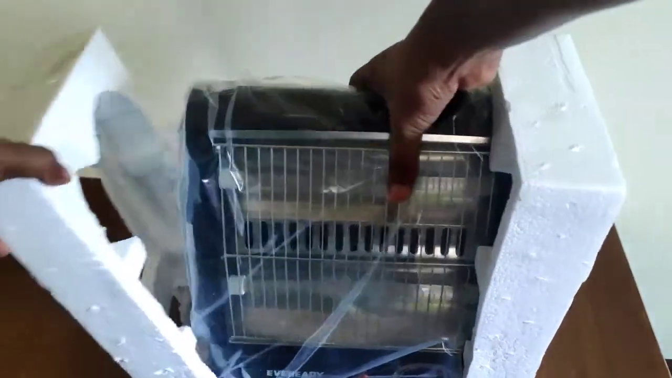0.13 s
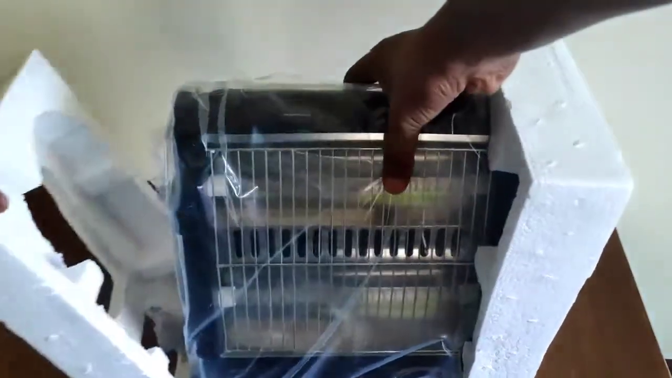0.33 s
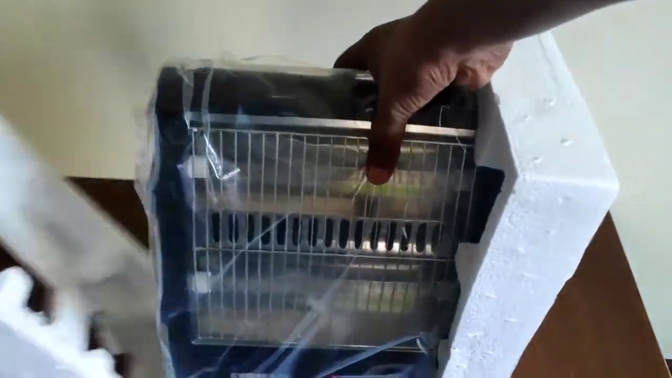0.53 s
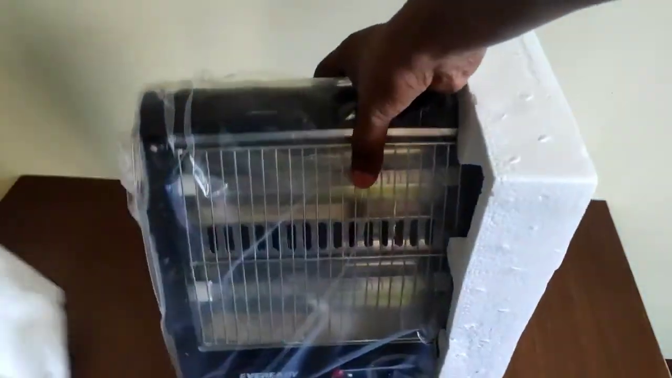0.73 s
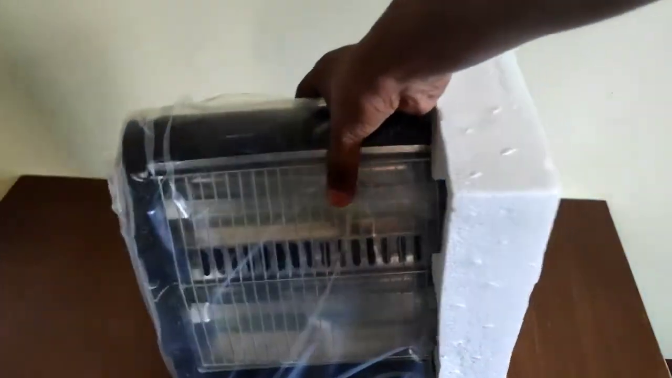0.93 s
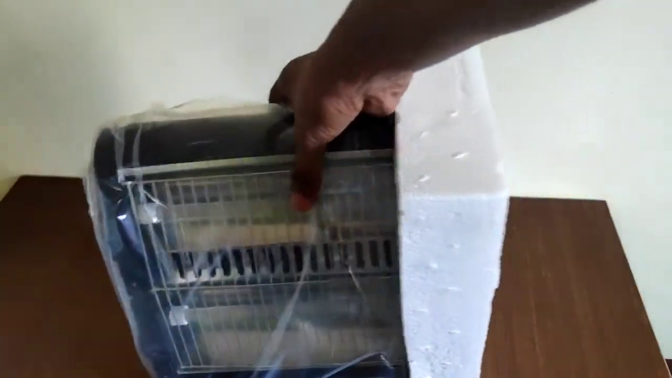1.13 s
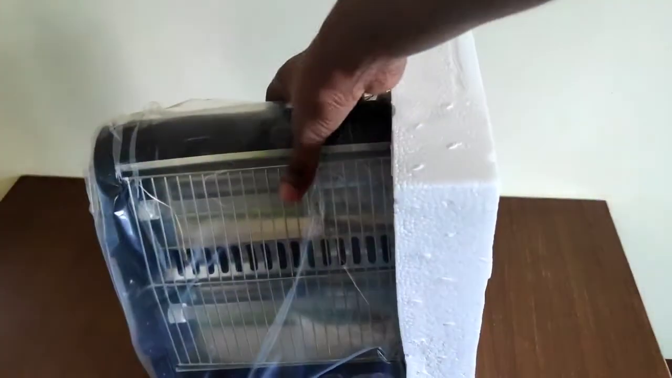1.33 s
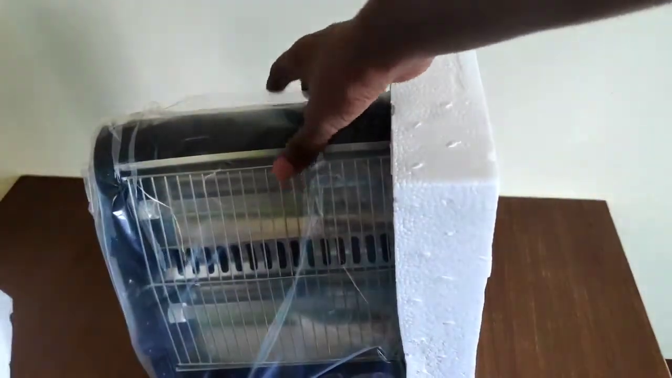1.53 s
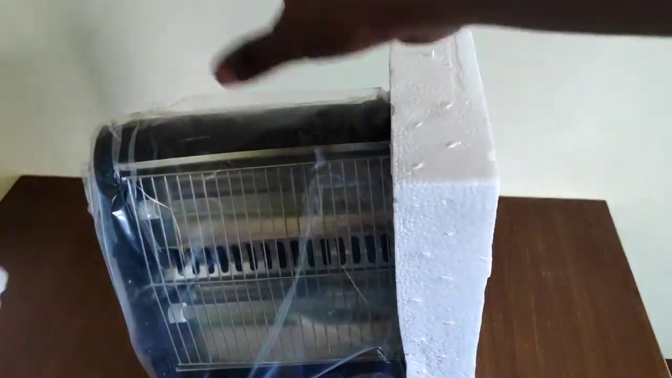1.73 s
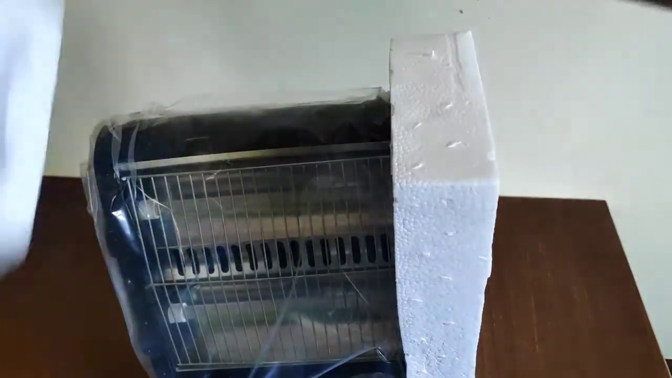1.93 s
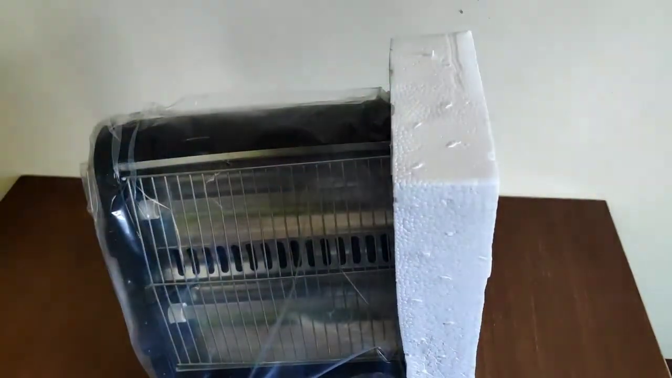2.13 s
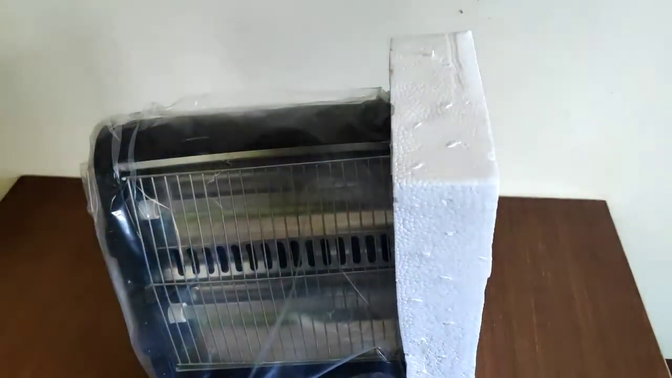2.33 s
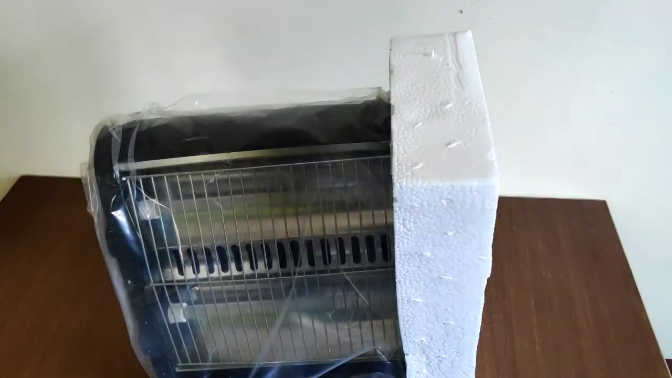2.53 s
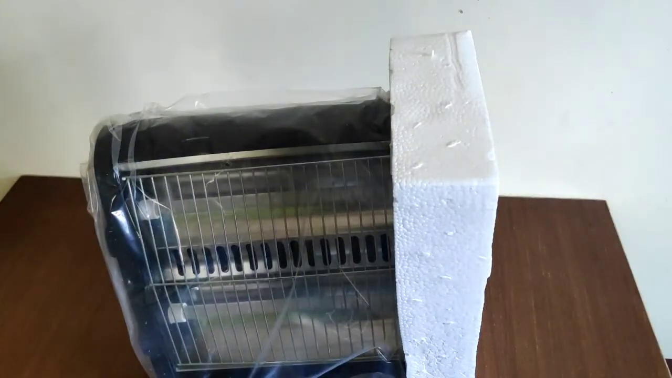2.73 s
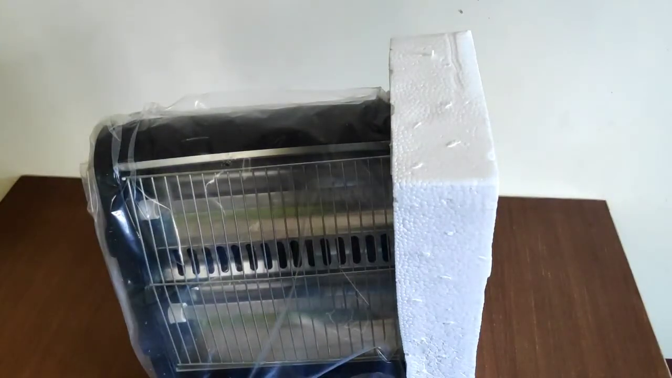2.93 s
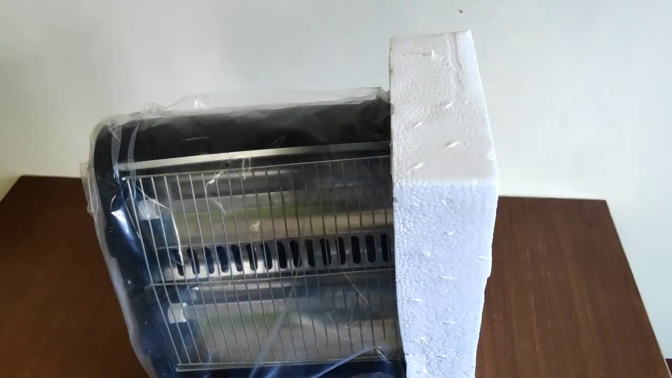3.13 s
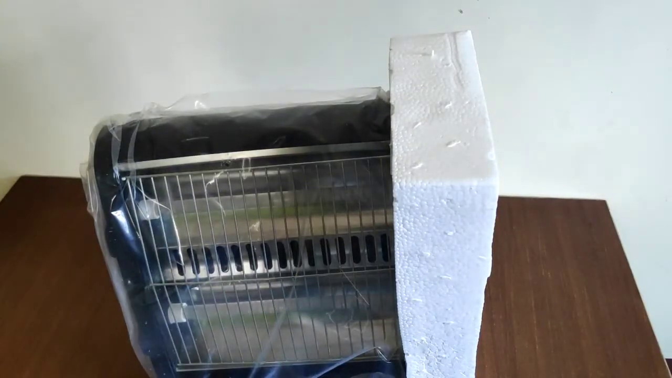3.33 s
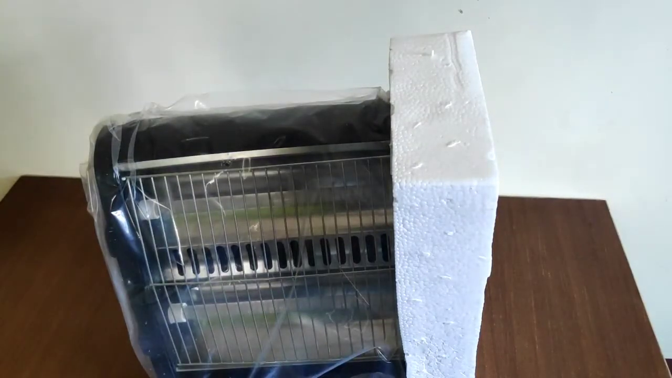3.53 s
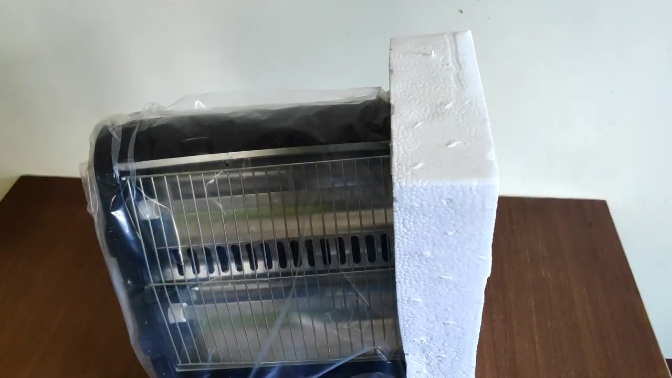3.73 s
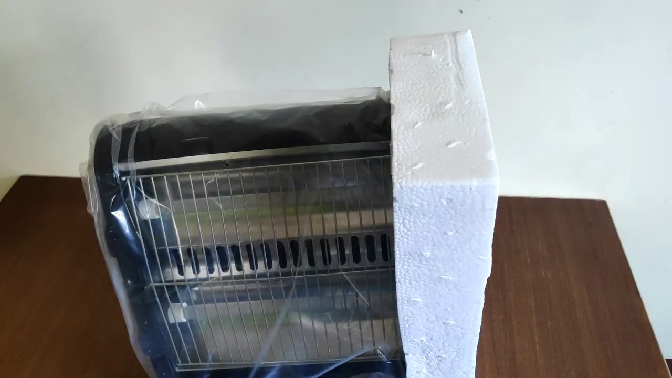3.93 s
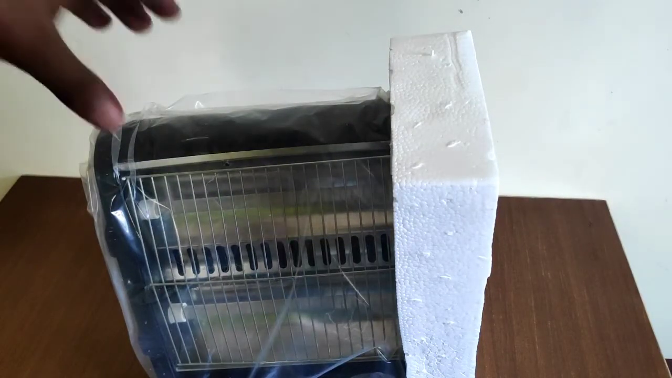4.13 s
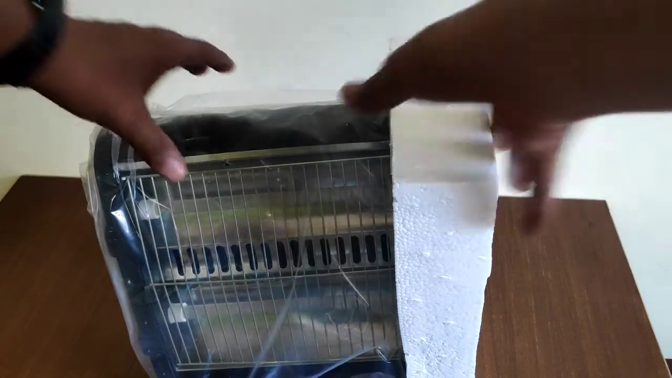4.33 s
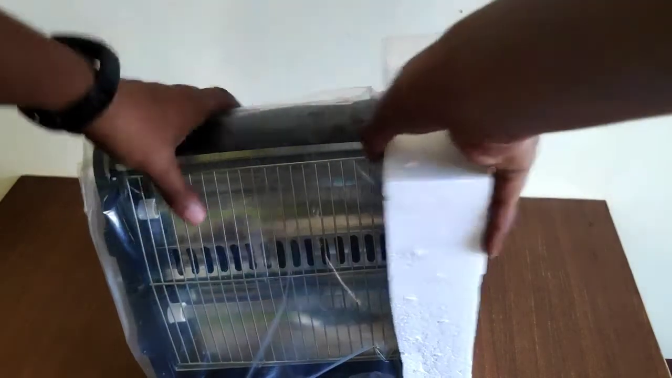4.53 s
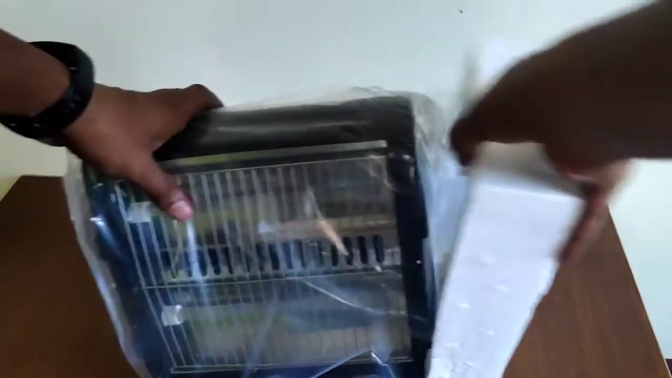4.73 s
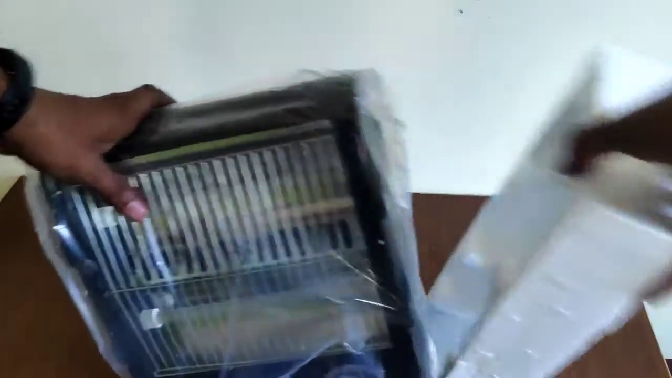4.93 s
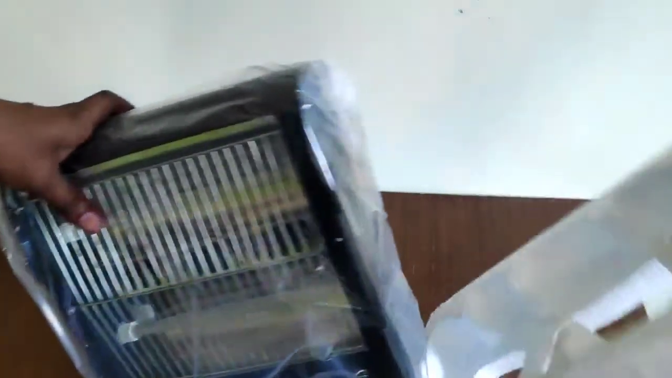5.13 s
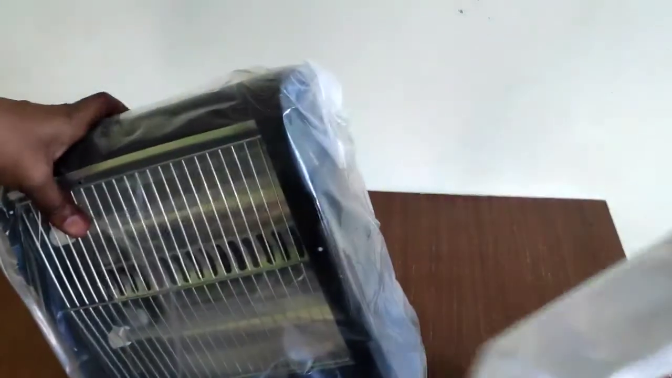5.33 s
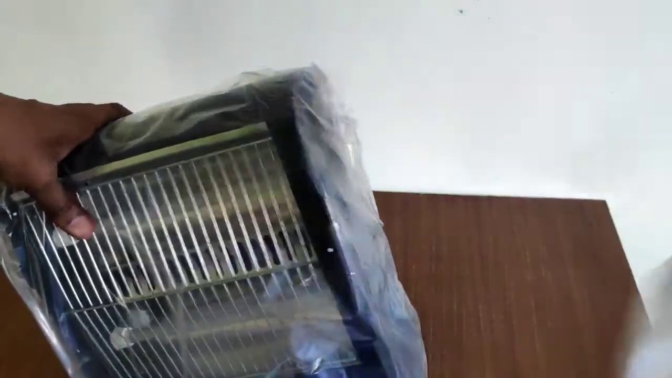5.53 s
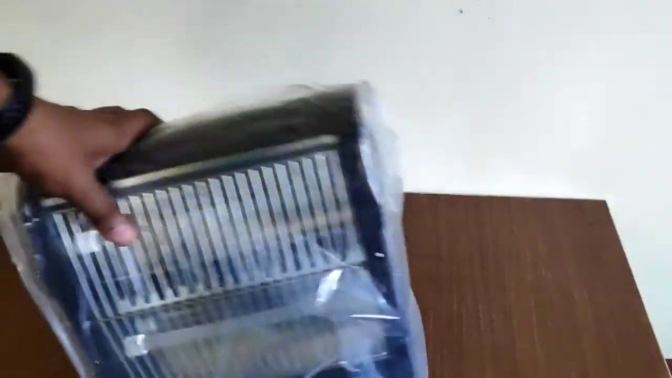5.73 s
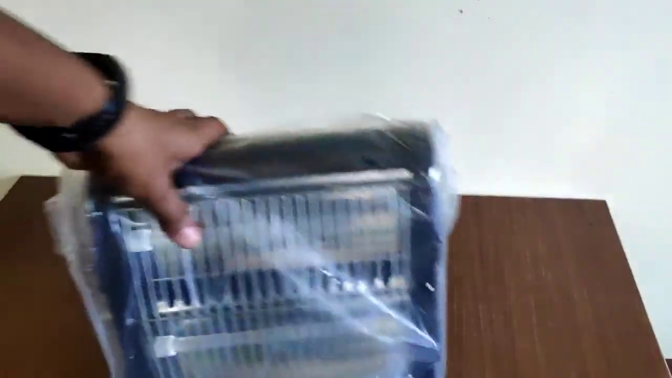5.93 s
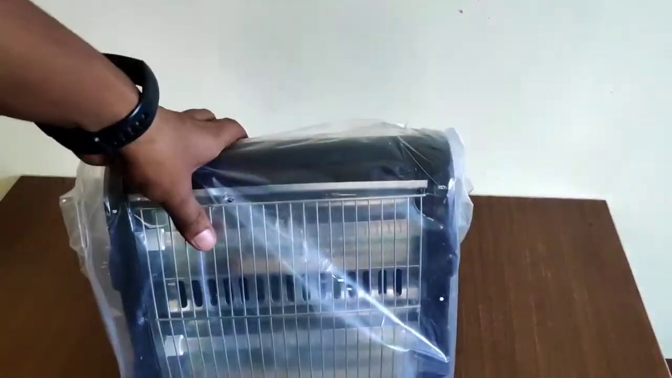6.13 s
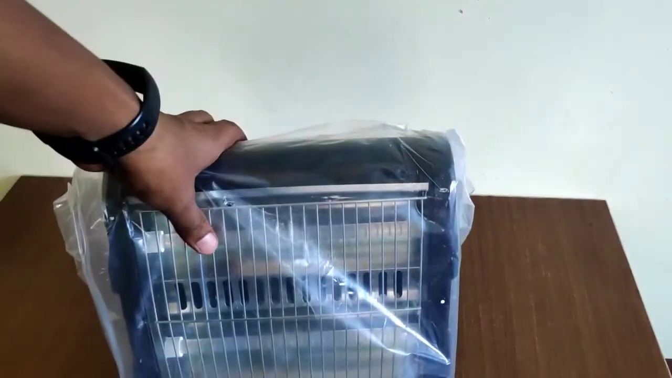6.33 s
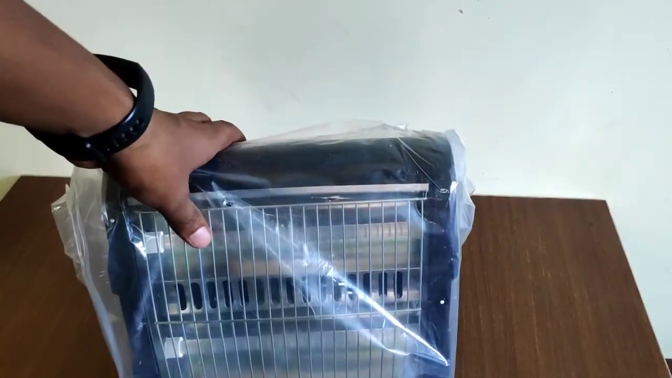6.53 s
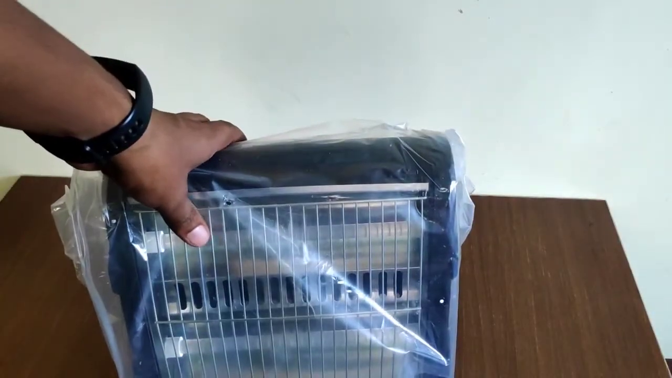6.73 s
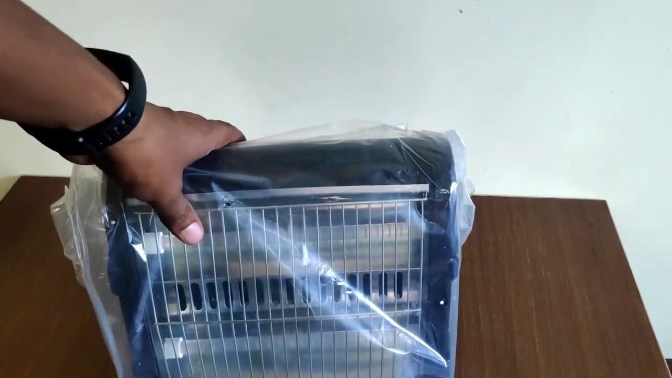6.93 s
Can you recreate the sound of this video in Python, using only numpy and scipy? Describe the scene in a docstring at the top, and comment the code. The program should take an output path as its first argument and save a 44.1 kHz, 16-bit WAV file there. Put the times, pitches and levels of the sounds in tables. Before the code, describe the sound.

Foam packing scrapes and snaps off a film-wrapped appliance, a heavy knock on a table, light foam clatter, more rubbing, another knock, then film rustle.

```python
"""Foam scrapes, squeaks and snaps, and film rustles, as packing blocks are worked off a film-wrapped heater.
The heater stands on a wooden table in a bare room; twice, tilted, it drops back onto the table.
In between, the first foam block is handled to one side and lands with a hollow clatter.
Friction is built from trains of tiny slips; snaps are decaying noise bursts and squeaks are gliding tones.
Knocks and bumps ring decaying modes over a filtered noise thud."""
import sys
import numpy as np
from scipy import signal
from scipy.io import wavfile
from scipy.ndimage import uniform_filter1d, minimum_filter1d

SR = 44100
rng = np.random.default_rng(int(sys.argv[2]) if len(sys.argv) > 2 else 0)


def file_out(sig):
    """Save sig as 16-bit WAV at sys.argv[1]."""
    # one column per channel
    cols = np.atleast_2d(sig).T
    # limit, then scale
    lim = np.clip(cols, -1, 1)
    pcm = np.round(lim * 32767).astype(np.int16)
    wavfile.write(sys.argv[1], SR, pcm)


N = 308700

# Rubs: the first block is tugged off, the heater settles and the block is carried aside, the second block
# is gripped and pulled off, the tilted heater is swung back, and the loose film is smoothed:
# (start [s], rise [s], hold [s], dying time [s], foam scrape [dB], film rustle [dB], body rumble [dB],
#  foam resonance [Hz], coarseness [dB]); levels are ahead of the balance in stroke() and scene()
RUB_STROKES = [ (0.0, 0.0067, 0.14, 0.063, -23, -32.5, -32.5, 1050, 4),
               (0.138, 0.0057, 0.037, 0.072, -20, -26, -32.5, 1520, 4.5),
               (0.276, 0.012, 0.01, 0.061, -23, -26.5, -31, 1370, 1.5),
               (0.442, 0.032, 0.057, 0.087, -31.5, -35, -37, 1910, 6),
               (.58, 0.043, 0.011, 0.017, -21.5, -19, -31.5, 2460, 4),
               (0.653, 0.012, 0.022, 0.02, -30.5, -20.5, -34, 1300, 3.5),
               (.87, 0.013, 0.13, 0.11, -34.5, -47, -43.5, 950, 2),
               (1.03, 0.0079, 0.092, 0.058, -40, -45.5, -43, 1680, 2.5),
               (1.14, 0.0068, 0.085, 0.044, -31.5, -47, -35, 1090, 1.5),
               (1.209, .01, 0.15, 0.12, -31.5, -41.5, -36.5, 1390, 3.5),
               (1.34, 0.079, 0.049, 0.12, -42, -39.5, -43.5, 980, 4),
               (1.736, 0.0061, 0.077, 0.05, -42, -50, -51, 1030, 4.5),
               (1.797, 0.06, 0.081, 0.039, -34.5, -36.5, -47, 1820, 1),
               (2.26, 0.0084, .13, 0.11, -43, -48, -68, 1120, -0.5),
               (2.405, 0.024, .005, .02, -30, -35, -47, 1760, 1.5),
               (2.449, .03, 0.072, 0.055, -42.5, -41, -46.5, 1510, 6.5),
               (2.539, .032, 0.0056, 0.018, -25, -26, -62, 1380, 0.7),
               (2.67, 0.039, 0.083, 0.02, -43, -43, -65, 1500, 4.3),
               (2.868, 0.0047, 0.0099, 0.023, -46, -72, -68, 1300, 5),
               (3.48, 0.018, 0.068, 0.042, -39.5, -28.5, -38, 2000, 2.5),
               (3.649, 0.039, 0.028, 0.035, -27.5, -31.5, -35, 1410, 2.4),
               (4.4441, 0.0056, 0.12, 0.033, -25.5, -23.5, -34.5, 1430, 1.5),
               (4.595, 0.019, 0.032, 0.042, -23.5, -29.5, -31, 960, 2.4),
               (4.651, 0.026, 0.067, 0.11, -24, -25, -33.5, 1450, 1.5),
               (4.914, 0.011, 0.026, 0.14, -29, -36.5, -40.5, 1440, 2),
               (5.049, 0.036, 0.064, .05, -29, -35, -34.5, 1400, 4),
               (5.215, 0.028, 0.018, 0.066, -22, -28, -30, 1450, 2.5),
               (5.485, 0.0051, 0.074, 0.094, -40, -52, -38, 1150, 4),
               (5.627, 0.0038, 0.16, 0.041, -35, -59, -30, 816, 2.5),
               (5.741, 0.041, 0.037, 0.21, -29.5, -36.5, -34.5, 1050, 3.5),
               (5.97, 0.018, 0.11, 0.037, -27.5, -38, -32.5, 1180, 2),
               (6.498, 0.015, 0.12, 0.036, -41, -18.5, -43, 2200, 1),
               (6.649, 0.011, 0.17, .04, -34, -32.5, -39, 1390, 1),
               (6.74, 0.0067, 0.014, 0.039, -34, -22, -45, 2950, 1),
               (6.84, 0.015, 0.076, 0.064, -26.5, -23.5, -34, 1490, 0.5)]
# Single snaps and scuffs of foam and film, loud to faint, ahead of the mix:
# (time [s], level [dB], centre [Hz], width [octaves], dying time [s])
SNAP_EVENTS = [(0.018, -17.5, 1940, 1.83, 0.014), (.031, -12, 2500, 1.4, 0.0025),
               (.079, -14, 2000, 1.4, 0.0051), (.102, -16.5, 2500, 1.8, 0.008),
               (.153, -11, 3430, 1.2, 0.0037), (.169, -15, 2880, 1.57, .011), (.270, -19, 1790, 1.67, 0.02),
               (.296, -14, 4000, 2, 0.0026), (.304, -10, 3400, 1.1, 0.0021), (.333, -20, 2900, 1.6, .013),
               (.473, -30, 2920, 1.2, .025), (.533, -23, 2630, 0.93, 0.0039),
               (.6268, -4.5, 4000, 1.4, .003), (.659, -18, 1500, 2.9, 0.0054),
               (.874, -27.5, 2030, 1.9, 0.0063), (1.048, -21.5, 3370, 0.4, 0.0022),
               (1.217, -19.5, 2770, 1.2, 0.0035), (1.579, -29, 2800, 0.86, 0.0021),
               (2.145, -47.5, 1500, 1.8, .011), (2.225, -39, 2000, 0.82, 0.0058),
               (2.253, -23, 1800, 2.7, 0.0087), (2.468, -32, 3500, 1.2, .003), (2.429, -21, 2220, 1, .0074),
               (2.565, -27.5, 1800, 1.5, 0.01), (2.873, -41, 1400, 1, 0.007), (3.275, -55, 660, .18, .045),
               (3.296, -60, 2200, 1, .02), (3.489, -30.5, 5980, 1.6, 0.098), (3.806, -18, 3550, 1.8, 0.035),
               (3.878, -19.5, 7560, 1.4, 0.025), (4.016, -33, 1780, 1.73, 0.037),
               (4.449, -18.5, 11630, 0.39, .06), (4.685, -14.5, 2000, 1.24, .0055),
               (4.758, -18, 4000, 2.2, 0.0056), (4.928, -23, 3500, 2.5, .006),
               (5.0445, -19.5, 4000, 2.2, .002), (5.211, -21, 5000, 2.4, .003),
               (5.372, -22.5, 2400, 1.3, .0035), (5.419, -26, 2300, 1.3, .0035),
               (5.490, -20, 7000, .55, .0017), (5.632, -22.5, 1130, 0.78, 0.011),
               (5.852, -22, 7400, 0.51, 0.0033), (6.363, -45, 4000, 0.87, 0.023),
               (6.468, -20, 7800, 1.42, 0.025), (6.504, -18, 6200, 0.57, 0.01),
               (6.744, -14.5, 4440, 1.07, 0.011), (6.843, -18, 5270, 1.63, .02)]
# Foam sticking and slipping fast enough to sing, ahead of the mix:
# (time [s], level [dB], length [s], first rate [Hz], last rate [Hz])
SQUEAK_EVENTS = [(0.629, -13.5, 0.0043, 3700, 1710), (4.444, -32.5, 0.038, 1493, 1354),
                 (4.529, -26, 0.0087, 1430, 1264), (4.603, -26, 0.018, 918, 926),
                 (4.979, -30.5, 0.005, 2170, 1940), (6.742, -27.5, 0.021, 2920, 2940),
                 (6.748, -28.5, 0.043, 3890, 3910)]
# Heater's feet hitting the table:
# (time [s], level [dB], contact cut-off [Hz], place [0 left to 1 right])
TABLE_KNOCKS = [(.662, -29.5, 700, 0.15), (1.246, -13, 940, .02), (1.276, -17, 510, 0.083),
                (2.253, -38, 1160, 0.76), (4.531, -28.5, 160, 0.33), (5.103, -23.5, 162, 0.41),
                (6.094, -9, 730, 0.9), (6.122, -21, 1110, 0.53)]
# Modes of heater and table together:
# (frequency [Hz], level struck at the left [dB], level struck at the right [dB], t60 [s])
TABLE_MODES = [(127.8, -5, 0.5, 0.53), (162.5, -4, -20, 0.27), (210, -1, -22, .5), (218.3, -0.5, -4, 0.49),
               (257, -15.5, -9.5, 0.38), (305, -11.5, -21.5, 0.57), (361, -13.5, -13.5, 0.68),
               (384, -5.5, -19, 0.52), (447, -18, 0.5, 0.47), (483, -8.5, 0.5, 0.25), (520, 5, 3.5, 0.19),
               (729, -23, 1, 0.32), (940, -2, -13.5, .22), (1076, -7.5, -21.5, .3),
               (1076, -22, -11.5, 0.21), (1400, -18, -12.5, 0.21)]
# Dull shuffles off to one side: (start [s], rise [s], hold [s], dying time [s], level [dB])
SHUFFLE_STROKES = [(2.127, 0.021, 0.096, 0.036, -44.5), (2.953, 0.037, .07, 0.11, -44.5)]
# A loose foam block bumping and bouncing: (time [s], level [dB], contact cut-off [Hz])
BLOCK_BUMPS = [(2.429, -51, 1405), (2.567, -51, 1197), (3.814, -19, 1860), (3.829, -18, 1650),
               (3.848, -20, 1560), (3.861, -33, 1490), (4.016, -30.5, 1800), (4.041, -28, 1700),
               (6.659, -27.5, 400)]
# Modes of the hollow foam block: (frequency [Hz], level [dB], t60 [s])
BLOCK_MODES = [(196, -21.5, 0.28), (232, -12, .25), (265.8, 2.5, 0.31), (334, 1.5, 0.57), (378, -5, 0.63),
               (582, 1, 0.25), (678, -7.5, 0.5), (654, -8.5, 0.8), (840, -13, 0.18), (926, 0, 0.26),
               (1210, -0.5, 0.18), (1270, -26, .26), (1580, -10, .19), (1740, 0, 0.22)]
# Spectrum of foam scrape: (frequency [Hz], relative density [dB per Hz])
FOAM_SPECTRUM = [(100, -28.5), (350, -18), (750, 0.5), (1400, -2), (2200, -3), (3600, -8), (5500, -14),
                 (9000, -15.5), (15000, -52.5)]
# Spectrum of film rustle: (frequency [Hz], relative density [dB per Hz])
FILM_SPECTRUM = [(300, -21.5), (1500, -3), (3000, -2.5), (5000, 0.5), (6500, -2), (9300, 3.5),
                 (11500, -0.5), (14500, -7)]
# Spectrum of the heater body's rumble: (frequency [Hz], relative density [dB per Hz])
BODY_SPECTRUM = [(25, -41.5), (70, -21.5), (115, -3), (200, 1.5), (300, 1), (480, 3), (800, -29),
                 (2500, -57.5), (15000, -75.5)]
# Spectrum of an impact's thud and wash: (frequency [Hz], relative density [dB per Hz])
THUD_SPECTRUM = [(25, -24.5), (70, -19.5), (115, 0), (220, 6.5), (320, -0.5), (540, 0.5), (1000, -2),
                 (2000, -3), (5000, -14.5), (15000, -12)]
# Spectrum of the dull shuffle: (frequency [Hz], relative density [dB per Hz])
SHUFFLE_SPECTRUM = [(25, -24), (80, -16.5), (120, -3.5), (190, 2.5), (290, -7), (420, -11.5), (600, -36),
                    (1500, -61), (15000, -81)]
# Spectrum of the quiet background: (frequency [Hz], relative density [dB per Hz])
FLOOR_SPECTRUM = [(25, -15), (70, -5.5), (140, 4), (400, -9), (1000, -25), (3000, -32), (8000, -33),
                  (14500, -29.5)]
# Reverberation of the bare room: (frequency [Hz], t60 [s])
ROOM_T60 = [(100, 0.51), (300, 1), (900, 0.7), (2500, 0.45), (6000, 0.42), (14000, 0.33)]

EDGE_HZ = 14550  # upper band limit
FILM_POWER = 1.28  # the rustle follows the rubbing speed more steeply than the scrape does
# small snaps during a rub; their level is relative to scrape plus coarseness
CRACKLE_PER_S, CRACKLE_DB, CRACKLE_SPREAD_DB = 16, -4, 2.5
CRACKLE_LOW_HZ, CRACKLE_HIGH_HZ, CRACKLE_OCTAVES, CRACKLE_DYING_S = 1500, 5530, 0.33, .003


def gain_of(db):
    """Logarithmic level: decibels become an amplitude ratio."""
    return 10 ** (np.asarray(db) / 20)


def evened(x):
    """Power normalisation: the rms becomes 1."""
    return x / np.sqrt(np.mean(x ** 2) + 1e-20)


def read(points, hz):
    """Interpolation on a logarithmic frequency axis."""
    f, value = np.transpose(points)
    return np.interp(np.log(hz + 1), np.log(f + 1), value)


def add(mix, s, sound):
    """Superposition: a sound is added in place from time s."""
    part = mix[max(round(s * SR), 0):][:len(sound)]
    part += sound[:len(part)]


def colour(x, points, size=4096):
    """Minimum-phase filtering: the spectrum fixes a causal response that keeps white noise's power."""
    log_gain = np.log(gain_of(read(points, abs(np.fft.fftfreq(size, 1 / SR)))))
    response = np.exp(np.conj(signal.hilbert(log_gain)))
    taps = np.fft.ifft(response).real[:size // 2]
    return signal.oaconvolve(x, taps / np.linalg.norm(taps))[:len(x)]


def swell(rise, hold, dying):
    """Stroke kinematics: rubbing speed rises linearly, holds and decays exponentially."""
    t = np.arange(0, rise + hold + 2 * np.pi * dying, 1 / SR)
    return np.minimum(t / rise, 1) * np.exp(-np.maximum(t - rise - hold, 0) / dying)


def slips(n, coarse_db, per_s=5000, clump_db=2.0, size=1800):
    """Stick-slip friction: clumped impulses of uneven size, held near unit local power."""
    sizes = gain_of(coarse_db * np.minimum(rng.exponential(1, n), 5)) * rng.choice([-1, 1], n)
    clumps = gain_of(clump_db * evened(uniform_filter1d(rng.standard_normal(n), size=130)))
    train = sizes * clumps * (rng.random(n) < per_s / SR)
    return train / np.sqrt(abs(uniform_filter1d(train ** 2, size)) + 1e-9)


def resonate(x, hz, width):
    """Resonance: a one-pole filter in a rotating frame has unit gain along the curve hz."""
    turn = np.exp(2j * np.pi * np.cumsum(hz) / SR)
    r = np.exp(-np.pi * width / SR)
    slow = signal.lfilter([1 - r], [1, -r], x / turn + 1e-18)
    return 2 * (turn * slow).real


def creaks(n, per_s=160, low_hz=650, high_hz=3800, size_db=3.0, count=60):
    """Plucked resonators: random plucks of uneven strength make foam patches ring briefly at their own pitches."""
    t, out = np.arange(1500) / SR, np.zeros(n)
    damping = np.exp(-t / .005)
    for hz in np.geomspace(low_hz, high_hz, count) * rng.uniform(1.0, 1.03, count):
        plucks = (rng.random(n) < per_s / count / SR) * gain_of(size_db * rng.standard_normal(n))
        out += signal.oaconvolve(plucks, damping * np.sin(2 * np.pi * hz * t))[:n]
    return evened(out)


def stroke(speed, scrape_db, rustle_db, rumble_db, ring_hz, coarse_db,
           ring_width_hz=260, ring_db=-6, creak_db=-6, foam_db=-0.5, film_db=0, body_db=-1, judder_db=1.4):
    """Frictional excitation: slips sound in the foam, crinkle the film and shake the heater's body."""
    n = len(speed)
    rub = slips(n, coarse_db)
    ringing = gain_of(ring_db) * evened(resonate(rub, np.full(n, ring_hz), ring_width_hz))
    ringing += gain_of(creak_db) * creaks(n)
    foam = speed * evened(colour(rub, FOAM_SPECTRUM) + ringing)
    crinkles = evened(rub + slips(n, coarse_db, per_s=9000, clump_db=1.0))
    film = speed ** FILM_POWER * colour(crinkles, FILM_SPECTRUM)
    body = speed * evened(colour(rub, BODY_SPECTRUM))
    sound = gain_of(scrape_db + foam_db) * foam
    sound += gain_of(rustle_db + film_db) * film
    sound += gain_of(rumble_db + body_db) * body
    # the block catches and lets go as a whole, which shakes all three together
    wander = uniform_filter1d(rng.standard_normal(n), size=450)
    judder = evened(uniform_filter1d(wander, size=150))
    return gain_of(judder_db * judder) * sound + gain_of(scrape_db + coarse_db) * crackle(speed)


def crackle(speed):
    """Random release: small snaps at chance moments, scaled by the rubbing speed."""
    out = np.zeros(len(speed))
    for at in np.flatnonzero(rng.random(len(speed)) < CRACKLE_PER_S / SR):
        hz = CRACKLE_LOW_HZ * (CRACKLE_HIGH_HZ / CRACKLE_LOW_HZ) ** rng.random()
        db = CRACKLE_DB + CRACKLE_SPREAD_DB * rng.standard_normal()
        add(out, at / SR, speed[at] * snap(db, hz, CRACKLE_OCTAVES, CRACKLE_DYING_S, uneven_db=5.5))
    return out


def near_walls(x, strength=0.17, latest=.007, count=6):
    """Comb filtering: table top and wall return delayed copies within milliseconds."""
    delays = (rng.uniform(.0006, latest, count) * SR).astype(int)
    return x + strength * sum((-1) ** k * np.pad(x, (d, 0))[:N] for k, d in enumerate(delays))


def room(x, gap=.004, size=12):
    """Reverberation: sparse reflections of random sign, each frequency band decaying at its own rate."""
    taps = np.zeros(SR)
    at = np.arange(int(gap * SR), SR - size, size)
    taps[at + rng.integers(0, size, len(at))] = rng.choice([-1., 1.], len(at))
    hz, t, z = signal.stft(taps, SR, nperseg=256)
    decay = gain_of(-60 * t / read(ROOM_T60, hz)[:, None])
    tail = signal.istft(z * decay, SR)[1]
    return signal.fftconvolve(x, tail / np.linalg.norm(tail))[:N]


def moving(x, space, shift_s=.17, count=4):
    """Changing paths: as the hands move, the sound fades from one set of paths to the next, in a cycle."""
    turn = np.arange(N) / SR / shift_s
    away = [np.minimum(abs((turn - k) % count - count / 2), 1) for k in range(count)]
    return sum(space(x * np.cos(np.pi / 2 * a)) for a in away)


def quiet_floor():
    """Stationary noise: a steady random signal with the background spectrum."""
    return gain_of(-62.5) * colour(rng.standard_normal(N), FLOOR_SPECTRUM)


def snap(db, hz, octaves, dying, uneven_db=1.5, rise_share=0.14):
    """Sudden release: a decaying noise burst, coloured by uneven resonances of the spot that lets go."""
    t = np.arange(0, 6 * dying + .01, 1 / SR)
    grid = np.geomspace(40, 16000, 130)
    hump_db = np.maximum(-4.3 * (np.log2(grid / hz) / octaves) ** 2, -50) - 10 * np.log10(grid)
    shape_db = hump_db + uneven_db * rng.standard_normal(len(grid))
    # the extra samples let the filter settle before the burst
    noise = colour(rng.standard_normal(len(t) + 2048), np.transpose([grid, shape_db]))
    burst = evened(noise[-len(t):])
    return gain_of(db) * burst * np.exp(-t / dying) * (1 - np.exp(-t / (rise_share * dying)))


def squeak(db, length, first_hz, last_hz, jitter=0.027, overtone=0.37):
    """Periodic stick-slip: a nearly regular slip rate glides and carries two overtones."""
    n = int(length * SR)
    wander = evened(uniform_filter1d(rng.standard_normal(n), size=40))
    hz = np.geomspace(first_hz, last_hz, n) * (1 + jitter * wander)
    phase = 2 * np.pi * np.cumsum(hz) / SR
    tone = evened(sum(overtone ** k * np.sin((k + 1) * phase) for k in range(3)))
    return gain_of(db) * tone * signal.windows.tukey(n, .3)


def blow(db, edge_hz, modes, ring_db, thud_db, thud_t60, wash_db, wash_t60):
    """Modal impact: modes ring over a dense thud and its wash; a soft contact removes treble."""
    t = np.arange(SR) / SR
    ring = sum(gain_of(level - 60 * t / t60) * np.cos(2 * np.pi * hz * t) for hz, level, t60 in modes)
    dying = gain_of(thud_db - 60 * t / thud_t60) + gain_of(wash_db - 60 * t / wash_t60)
    thud = colour(rng.standard_normal(SR) * dying, THUD_SPECTRUM)
    contact = signal.butter(N=3, Wn=min(edge_hz, SR / 3), fs=SR, output="sos")
    return gain_of(db) * signal.sosfilt(contact, gain_of(ring_db) * ring + thud)


def knock(db, edge_hz, place):
    """Position-dependent excitation: where the feet strike sets the level of each table mode."""
    modes = [(hz, left + place * (right - left), t60) for hz, left, right, t60 in TABLE_MODES]
    return blow(db, edge_hz, modes, ring_db=-1.5, thud_db=6.5, thud_t60=0.052, wash_db=2.5, wash_t60=0.54)


def shuffle(rise, hold, dying, db):
    """Broadband friction: dull noise follows the speed of the stroke."""
    speed = swell(rise, hold, dying)
    noise = evened(colour(rng.standard_normal(len(speed)), SHUFFLE_SPECTRUM))
    return speed * gain_of(db) * noise


def light(x, low_hz=170):
    """Radiation efficiency: a light foam block radiates little bass."""
    return signal.sosfilt(signal.butter(N=2, Wn=low_hz, btype="high", fs=SR, output="sos"), x)


def bump(db, edge_hz):
    """Hollow-body impact: a blow rings the modes of the light foam block."""
    return light(blow(db, edge_hz, BLOCK_MODES, ring_db=-6.0,
                      thud_db=2, thud_t60=0.053, wash_db=2.0, wash_t60=0.53))


def scene():
    """Superposition of all handling, the echo of rubs and snaps, and a quiet floor, in two equal channels."""
    rubs, snaps, hits = np.zeros((3, N))
    for s, rise, hold, dying, *row in RUB_STROKES:
        add(rubs, s, stroke(swell(rise, hold, dying), *row))
    for s, *row in SNAP_EVENTS:
        add(snaps, s, snap(*row))
    for s, *row in SQUEAK_EVENTS:
        add(snaps, s, squeak(*row))
    for s, *row in TABLE_KNOCKS:
        add(hits, s, knock(*row))
    for s, *row in SHUFFLE_STROKES:
        add(hits, s, shuffle(*row))
    for s, *row in BLOCK_BUMPS:
        add(hits, s, bump(*row))
    direct = gain_of(-5.0) * moving(rubs, near_walls) + gain_of(1.5) * snaps + hits
    echo = moving(gain_of(-10.5) * rubs + gain_of(-6) * snaps, room)
    return np.tile(direct + echo + quiet_floor(), (2, 1))


def record(dry, ceiling=1.0):
    """Transduction: the microphone loses deep bass, a fast limiter holds peaks, and the band is limited."""
    thin = signal.sosfilt(signal.butter(N=2, Wn=55, btype="high", fs=SR, output="sos"), dry)
    allowed = ceiling / np.maximum(abs(thin).max(0), ceiling)
    held = thin * uniform_filter1d(minimum_filter1d(allowed, size=90), size=90)
    edge = signal.firwin(1001, EDGE_HZ, window=("kaiser", 8), fs=SR)
    return signal.oaconvolve(held, edge[None], "same")


dry = scene()
out = record(dry)
file_out(out)
```